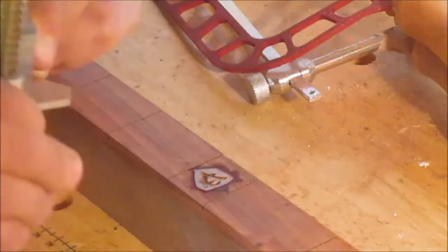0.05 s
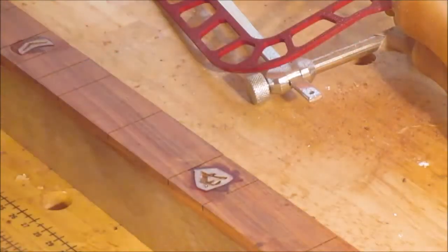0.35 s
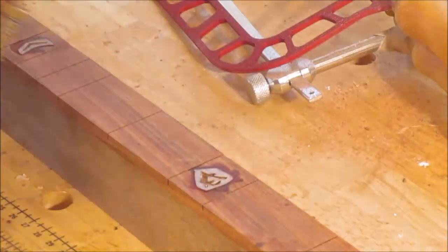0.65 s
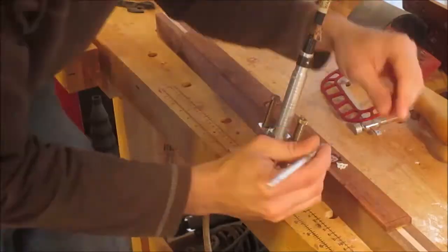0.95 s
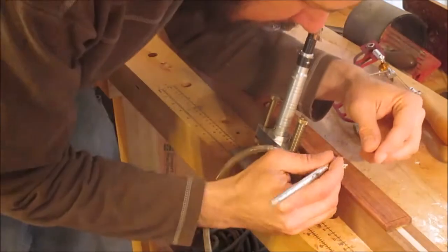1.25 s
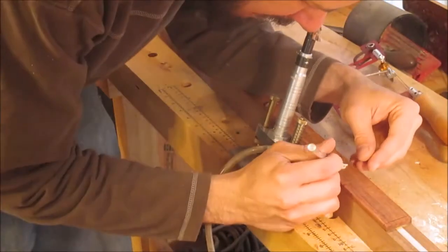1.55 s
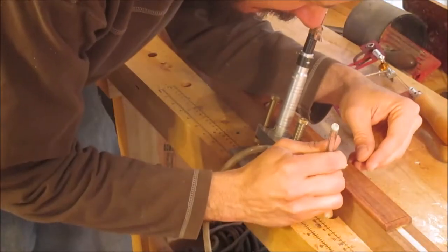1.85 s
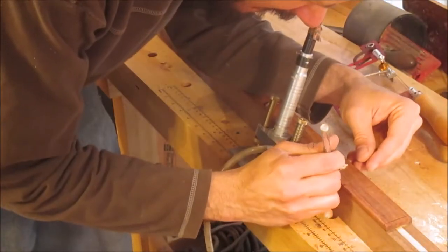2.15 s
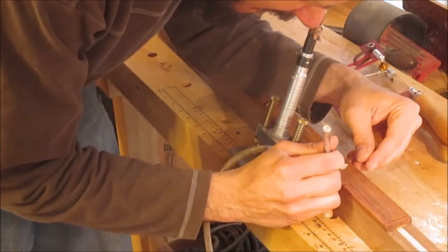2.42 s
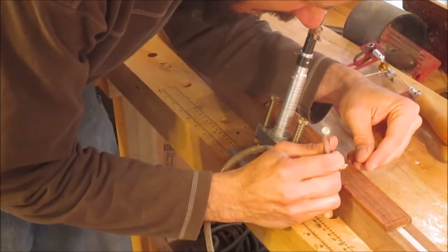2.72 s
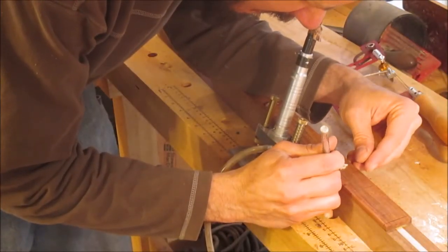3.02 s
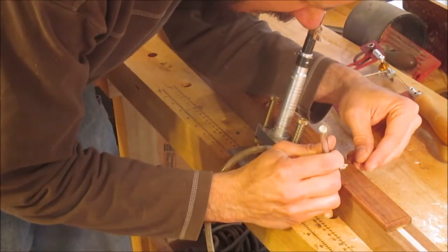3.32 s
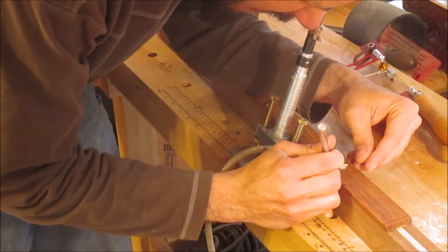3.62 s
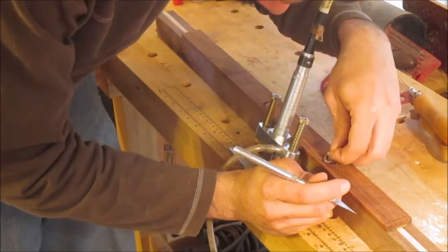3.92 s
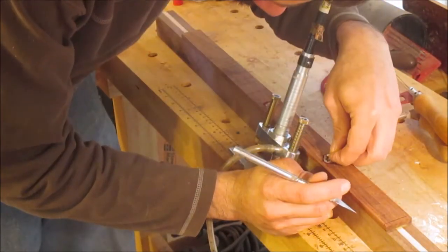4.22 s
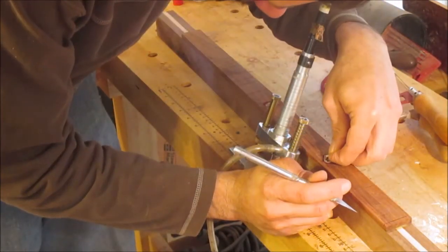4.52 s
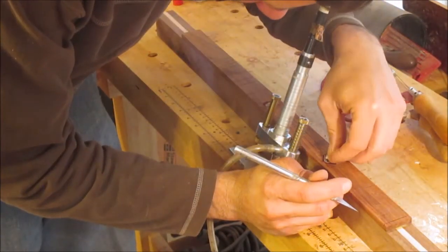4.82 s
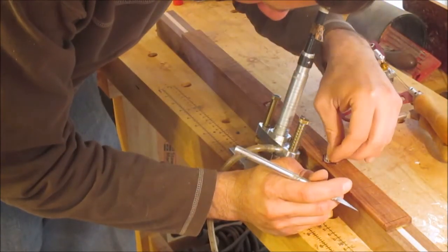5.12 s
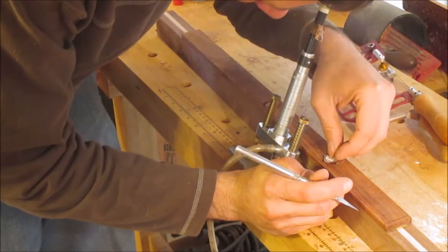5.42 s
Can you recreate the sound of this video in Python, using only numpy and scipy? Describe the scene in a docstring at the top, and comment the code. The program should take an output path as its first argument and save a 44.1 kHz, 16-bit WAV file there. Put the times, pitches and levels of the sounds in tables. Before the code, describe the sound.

A rotary tool whines loudly on wood and cuts off, leaving a quiet air pump hum with light metal clicks.

```python
"""A flex-shaft rotary tool whines over a wooden fretboard, its motor buzzing and its cooling air rushing.
The router base knocks once on the wood, then the whine cuts off. After a brief gap, a small air pump's
hum comes in with a short, soft swish; its diaphragm (a flexing skin) puffs air through a hissing hose.
From about two seconds on, a steel point slips and clicks against an inlay in the routed pocket.
Before the last click the hands move, the air finds a new path and the hiss changes colour."""
import sys
import numpy as np
from scipy import signal
from scipy.fft import rfft, irfft, next_fast_len
from scipy.io import wavfile
from scipy.ndimage import uniform_filter1d, map_coordinates

SR = 44100
rng = np.random.default_rng(int(sys.argv[2]) if len(sys.argv) > 2 else 0)


def master_out(mix):
    """Clip the mix to full scale and print it as 16-bit PCM to the path in sys.argv[1]."""
    frames = np.transpose(np.atleast_2d(mix))
    ceiling = np.clip(frames, -1, 1)
    pcm = np.round(ceiling * 32767).astype(np.int16)
    wavfile.write(sys.argv[1], SR, pcm)


N = 249595
WHINE_CUT_S, HUM_IN_S, HANDS_MOVE_S = 0.945, 0.977, 3.88
SPINDLE_HZ, MAINS_HZ = 699.5, 120.03


def amp(db):
    """Turn decibels into a factor to multiply by."""
    return 10 ** (np.asarray(db) / 20)


def unit(x):
    """Scale a signal so that its average strength (rms) is 1."""
    return x / np.sqrt(np.mean(x ** 2) + 1e-20)


def clock():
    """The time of every sample, in seconds."""
    return np.arange(N) / SR


def wobble(rate):
    """A smooth curve through `rate` random values a second."""
    steps = np.arange(0, N / SR * rate + 1, 1 / 8)
    curve = map_coordinates(rng.standard_normal(int(steps[-1]) + 2), [steps])
    return np.interp(clock() * rate, steps, curve)


def swell(start_s, rise_s, fall_s):
    """A straight climb from 0 to 1 and a straight fall back."""
    t = clock() - start_s
    return np.clip(np.minimum(t / rise_s, 1 - (t - rise_s) / fall_s), 0, 1)


def turning(hz):
    """The angle (phase) of something that turns at a steady or changing rate."""
    return 2 * np.pi * np.cumsum(hz * np.ones(N)) / SR


def tone(phase, db, waver_db):
    """A pure tone whose level wavers around db."""
    level = amp(db + waver_db * wobble(7.37))
    return np.sqrt(2) * level * np.cos(phase + rng.uniform(0, 2 * np.pi))


def filtered(x, response):
    """Turn each frequency in x up or down by the factor response(hz)."""
    size = next_fast_len(N + SR // 2)
    return irfft(rfft(x, size) * response(np.fft.rfftfreq(size, 1 / SR)), size)[..., :N]


def rush(spectrum, patchy_db, bumps=()):
    """Patchy noise shaped by a spectrum (frequency [Hz], level [dB]) and by peaks or dips on it."""
    grid = signal.stft(rng.standard_normal(N), nperseg=512)[2]
    patches = uniform_filter1d(rng.standard_normal(grid.shape), size=5, axis=0)  # blur over pitch
    patches = uniform_filter1d(patches, size=10, axis=1)  # blur over time
    noise = signal.istft(grid * amp(patchy_db * unit(patches)), nperseg=512)[1][:N]
    points_hz, points_db = np.transpose(spectrum)
    outline = lambda hz: np.interp(np.log(hz + 1), np.log(points_hz), points_db)
    lift = lambda hz: sum(db / (1 + (2 * (hz - centre) / width) ** 2) for centre, width, db in bumps)
    return unit(filtered(noise, lambda hz: amp(outline(hz) + lift(hz))))


def walls(x, share_db):
    """Bench and walls send back weak, quick echoes that colour the sound."""
    delays_s = rng.uniform(.003, .02, size=14)
    echoes = sum(rng.choice([-1, 1]) * np.roll(x, round(delay * SR)) for delay in delays_s)
    return unit(x + amp(share_db) * unit(echoes))


def workshop():
    """Low room noise with a few faint tones, and a short, soft swish as the hum comes in."""
    # the room's rumble: (frequency [Hz], relative level [dB])
    rumble = [(25, -9), (55, -3.5), (130, 2), (200, 1.5), (290, -2.5), (420, -7.5), (560, -5), (850, -12),
              (1250, -12), (2000, -18), (6000, -51), (15500, -48)]
    # faint low room tones: (pitch [Hz], level [dB])
    room_tones = [(55, -65.5), (95, -61.5)]
    # a distant tone swells and rises, twice:
    # (loudest moment [s], half length [s], pitch then [Hz], rise [Hz/s], level [dB])
    glides = [(4.143, 0.3, 160, 170, -50), (5.66, 0.3, 153, 3.85, -47)]
    t = clock()
    since = np.maximum(t - HUM_IN_S, 0)
    tones = sum(tone(turning(hz), db + 2 * wobble(2.17), waver_db=1.8) for hz, db in room_tones)
    drone_hz = 348.8 - 2.4 * since  # one faint tone sinks slowly
    drone_db = -58 - 7 * np.maximum(t - HANDS_MOVE_S, 0)
    tones += tone(turning(drone_hz), drone_db, waver_db=1.8)
    for peak_s, half_s, hz, rise, db in glides:
        pitch = hz + rise * np.clip(t - peak_s, -half_s, half_s)
        tones += swell(peak_s - half_s, half_s, half_s) * tone(turning(pitch), db, waver_db=1.8)
    swish_db = -42.5 - 60 * np.maximum(since - 0.071, 0) / 0.25  # holds briefly, then fades
    swish = amp(swish_db) * rush([(100, 12.5), (1500, 1), (6000, 2.0), (15000, -10)], patchy_db=4.5)
    return tones + swish + amp(-50.5) * rush(rumble, patchy_db=2.5)


def hose_hiss(cycle):
    """Air leaves the hose in puffs; its whistling changes when the hands move and it finds a new path."""
    # air at the hose end: (frequency [Hz], relative level [dB])
    hiss = [(500, -29), (1500, 1), (2350, 0.5), (2700, 5), (4000, 2), (6000, 2), (7700, -2), (9300, -1.5),
            (10600, 0.5), (12000, -3), (13700, -6.5), (15200, -4)]
    # the air's whistles: (frequency [Hz], width [Hz], boost before the move [dB], boost after [dB])
    whistles = [(2990, 86, -4, 7.5), (3420, 370, -3, 3), (3960, 260, 3, 7.5), (4480, 120, 0, 6),
                (6000, 230, 3, -5), (6400, 90, 1, 10), (8200, 300, 0, 7), (10300, 760, -2.5, 6),
                (10900, 190, 4, 4.5), (12200, 150, 10, 4), (12720, 120, 7, 10)]
    before = rush(hiss, patchy_db=1.7, bumps=[(hz, width, db) for hz, width, db, _ in whistles])
    after = rush(hiss, patchy_db=1.7, bumps=[(hz, width, db) for hz, width, _, db in whistles])
    moved = np.clip((clock() - HANDS_MOVE_S) / 0.086 + .5, 0, 1)
    jet = walls(np.sqrt(1 - moved) * before + np.sqrt(moved) * after, share_db=-3.5)
    puffs = 1 + .21 * np.cos(cycle) + .21 * np.cos(2 * cycle) + .1 * np.cos(3 * cycle)
    flow_db = -54 + moved + 0.33 * wobble(2.85)  # 1 dB louder after the move
    return amp(flow_db) * unit(puffs * jet)


def pump_hum(cycle):
    """The diaphragm beats twice a cycle, making a low hum with a thin buzz on top."""
    # the diaphragm's hum: (multiple of MAINS_HZ, level [dB]); beat_db sets the level of multiple 2
    harmonics = [(1, -49.4), (2, -43.6), (3, -59), (4, -50.6), (5, -68), (6, -51.5), (7, -76), (8, -49.2),
                 (9, -74), (10, -63.7), (11, -64.3), (12, -78), (13, -71), (14, -76), (15, -69.5)]
    # the diaphragm's upper buzz: (frequency [Hz], level of each tone near there [dB])
    rattle = [(1900, -74), (2400, -83.5), (2640, -70.5), (2880, -78.5), (3100, -83), (3240, -74.5),
              (3500, -95.5), (4560, -80.5), (6000, -86)]
    since = clock() - HUM_IN_S
    surge_db = 3.5 * swell(start_s=1.21, rise_s=0.14, fall_s=0.77)
    beat_db = -43 - 0.45 * since + surge_db  # the main beat swells once and slowly eases off
    hum = np.zeros(N)
    for k, db in harmonics:
        level_db = beat_db if k == 2 else db - 0.05 * since
        flutter_db = 0.7 * wobble(14)
        # even multiples bunch into beats; odd ones, about a quarter turn off, make push and pull unlike
        offset = k % 2 * np.pi / 2 + rng.normal(0, 0.64)
        hum += np.sqrt(2) * amp(level_db + flutter_db) * np.cos(k * cycle + offset)
    for k in np.arange(len(harmonics) + 1, rattle[-1][0] // MAINS_HZ):
        buzz_db = np.interp(k * MAINS_HZ, *np.transpose(rattle)) + rng.normal(0, 2.1)
        hum += tone(k * cycle, buzz_db, waver_db=1.3)
    return hum


def air_pump():
    """Mains power drives the diaphragm, so the hum and the puffs of air keep the same beat."""
    cycle = turning(MAINS_HZ * (1 + 0.00021 * wobble(2.98)))
    return pump_hum(cycle) + hose_hiss(cycle)


def inlay_clicks():
    """The steel point slips, snaps and chatters on the inlay, which rings; the small room answers."""
    # slips of the point: (time [s], relative snap level [dB], relative chatter level [dB],
    # chatter delay [s], brightness [dB per octave])
    slips = [(2.1709, -32, -31.5, 0.0032, -3.5), (2.5824, -22.5, -25.5, 0.0026, -2.5),
             (2.6634, -34, -40, 0.0027, -4), (2.9102, -23, -30.5, 0.0026, -3),
             (3.1995, -21, -32, 0.0052, 0.5), (3.4720, -20.5, -27, 0.0026, 4.5),
             (3.486, -25, -32, 0.0036, -4), (3.7192, -23, -25.5, 0.0037, -2.5),
             (5.1805, -27, -38.5, 0.0021, -1)]
    # where the inlay rings: (frequency [Hz], width [Hz], relative level [dB])
    rings = [(278, 41, 4), (780, 400, -7), (1270, 79, 1), (2120, 990, -13.5), (3043, 170, 1.5),
             (3830, 350, -8), (4700, 360, -4.5), (5550, 1100, -10), (8100, 870, -7), (9660, 1250, -0.5),
             (10050, 500, -8), (11300, 400, -12), (13100, 2200, -9)]
    snap_s, echo_s = 0.00065, 0.22
    out = np.zeros(N)
    t = np.arange(SR // 3) / SR
    f = np.fft.rfftfreq(len(t), 1 / SR)
    body = sum(amp(db) * 1j * f * width / (hz * hz - f * f + 1j * f * width) for hz, width, db in rings)
    contact = 1 / np.sqrt(1 + (f / 13500) ** 12)  # the touch lasts too long to stir the highest treble
    octaves = np.log2(np.clip(f, 1000, 10000) / 6000)
    for start_s, snap_db, chatter_db, delay_s, brightness in slips:
        snap = amp(snap_db) * np.exp(-t / snap_s)
        chatter = amp(chatter_db) * (t / delay_s) * np.exp(1 - t / delay_s)
        echo_db = (snap_db + chatter_db) / 2 - 11 - 60 * t / echo_s
        echo = amp(echo_db) * (1 - np.exp(-t / 0.0056))
        burst = np.sqrt(snap ** 2 + chatter ** 2 + echo ** 2) * rng.standard_normal(len(t))
        spectrum = rfft(burst) * body * contact * amp(brightness * octaves)
        click = irfft(spectrum, len(t))[:len(t) // 2]
        out[round(start_s * SR):][:len(click)] += click
    return out


def base_knock():
    """The metal router base rings briefly, and the board under it thuds."""
    # two touches, heard as one knock: (time [s], relative ring level [dB], relative thud level [dB])
    touches = [(0.808, -14.5, -27.5), (0.817, -19.5, -20.5)]
    # the base's ringing tones: (pitch [Hz], relative level [dB], time to fade by 60 dB [s])
    rings = [(160, -11, 0.11), (543, -14, 0.064), (1130, -9.5, 0.11), (1964, 5, 0.058), (2970, -6, 0.063)]
    # the board's thud: (frequency [Hz], relative level [dB])
    wood = [(60, -23), (140, -30), (280, 7.5), (420, 1), (600, 8), (800, -3), (1200, 2), (1700, -26),
            (2500, -7), (6000, -46)]
    out = np.zeros(N)
    for start_s, ring_db, thud_db in touches:
        t = np.maximum(clock() - start_s, 0)
        ring = sum(amp(db - 60 * t / fade_s) * np.sin(2 * np.pi * hz * t) for hz, db, fade_s in rings)
        thud = amp(-60 * t / 0.098) * rush(wood, patchy_db=1.5)
        onset = 1 - np.exp(-t / 0.0025)
        out += (amp(ring_db) * ring + amp(thud_db + 6.5) * thud) * onset
    return out


def rotary_tool():
    """The spindle whines at multiples of its turning rate, over motor buzz and air in the housing."""
    # the spindle's whine: (multiple of SPINDLE_HZ, level [dB])
    harmonics = [(1, -22.0), (2, -42.4), (3, -47.4), (4, -42.3), (5, -47.8), (7, -50.5), (8, -49.6),
                 (9, -39.0), (12, -33.2), (13, -48.9), (15, -45.6), (16, -38.9), (17, -42.3), (18, -45.1),
                 (19, -45.1), (20, -47.3), (21, -43.1)]
    # magnetic buzz and shaft tones: (pitch [Hz], level [dB])
    motor_tones = [(55.7, -40.9), (120, -47.6), (151.6, -43.4), (240, -17.0), (278.7, -37.0),
                   (557.3, -40.9)]
    # rush of cooling air and bearings: (frequency [Hz], relative level [dB])
    cooling_air = [(25, -14), (60, -15), (200, -2.5), (400, 2), (850, -3), (1300, -3.5), (1700, 3),
                   (2550, -4), (4000, 1), (4850, -3), (6200, 0), (8100, -1.5), (9400, -8), (15500, -8.5)]
    # how the housing colours that rush: (frequency [Hz], width [Hz], boost [dB])
    housing = [(127, 27, 12), (410, 82, -9), (533, 170, 3.5), (1005, 60, 6.5), (1965, 87, 6),
               (2840, 79, -1), (3170, 48, 4.5), (3316, 91, 8), (3600, 120, 6), (4330, 74, -1),
               (4730, 220, -3.5), (5630, 54, 2), (6950, 110, 0)]
    shaft = turning(SPINDLE_HZ * (1 + 0.00015 * wobble(3.6)))
    whine = sum(tone(k * shaft, db, waver_db=.3 if k == 1 else 1.4) for k, db in harmonics)
    whistle = tone(22 * shaft, db=-38.5 + 6 * clock(), waver_db=2.8)  # the highest tone slowly grows
    buzz = sum(tone(turning(hz), db, waver_db=-0.05) for hz, db in motor_tones)
    air = walls(rush(cooling_air, patchy_db=1, bumps=housing), share_db=-9.5)
    return whine + whistle + buzz + amp(-20.5 + 0.25 * wobble(24.7)) * air


def scene():
    """The loud whine cuts off with a faint tail; after a brief gap come the hum, room and clicks."""
    t = clock()
    whine_out = np.clip((WHINE_CUT_S - t) / 0.00064, 0, 1)
    gap = (t >= WHINE_CUT_S) & (t < HUM_IN_S)
    tail = gap * amp(-24 - 60 * np.abs(t - WHINE_CUT_S) / .13)
    bench_in = np.clip((t - HUM_IN_S) / 0.0014, 0, 1)
    routing = (whine_out + tail) * (rotary_tool() + base_knock())
    bench = bench_in * (air_pump() + workshop() + inlay_clicks())
    mono = routing + bench
    return np.array([mono, mono])


def record(dry):
    """One close microphone, with the very highest treble cut away."""
    top_hz = 15780
    return filtered(dry, lambda hz: np.clip((top_hz - hz) / 100 + .5, 0, 1))


dry = scene()
out = record(dry)
master_out(out)
```